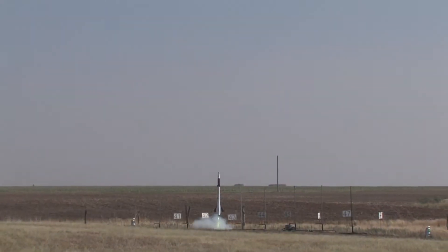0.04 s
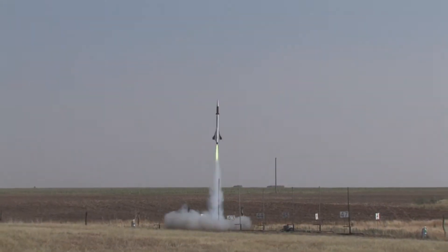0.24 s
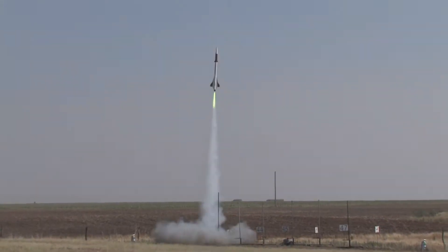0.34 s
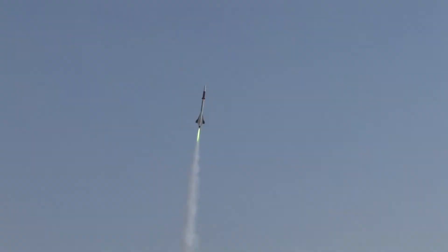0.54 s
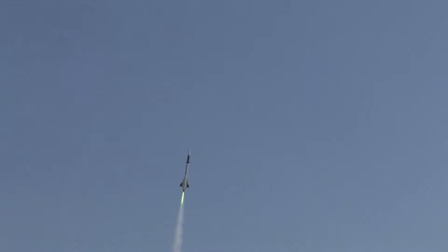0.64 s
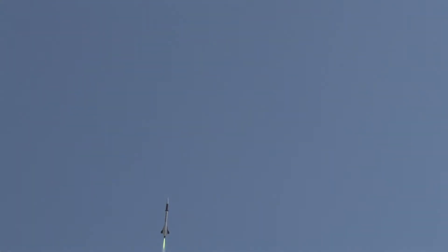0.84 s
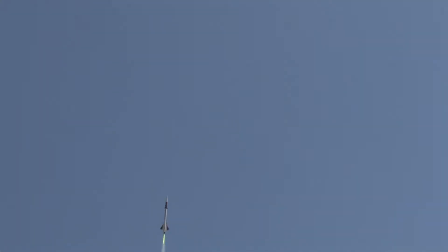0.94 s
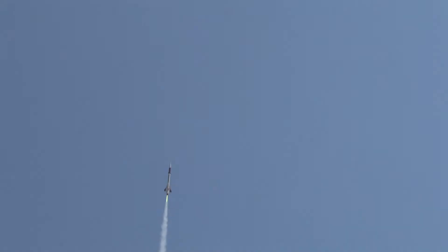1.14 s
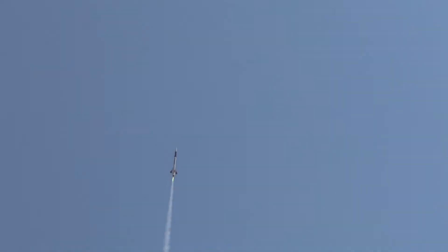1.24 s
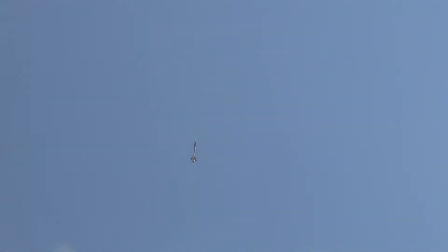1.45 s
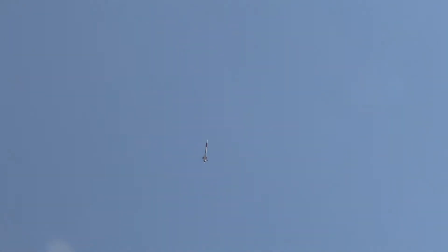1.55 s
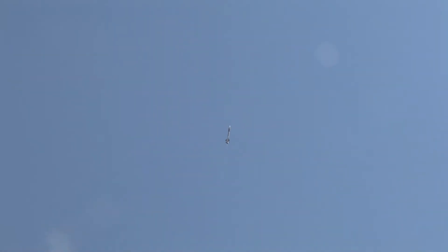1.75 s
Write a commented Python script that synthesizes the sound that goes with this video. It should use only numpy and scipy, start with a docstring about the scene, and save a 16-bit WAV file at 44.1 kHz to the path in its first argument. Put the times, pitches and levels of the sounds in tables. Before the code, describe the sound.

A small rocket lights with a few low puffs, then roars and crackles loudly as it climbs from an open field. The roar sweeps downward and cuts off, leaving a brief echo and a low breeze on the microphone.

```python
"""A low breeze on the microphone and a faint igniter hiss, then a small rocket lights on its pad in an
open field with a few low puffs and a hollow note. Its jet roars and crackles, swelling and fading in the
turbulent air, until it burns out. As it climbs away, the echo off the ground arrives ever later and
sweeps the roar downward. The field answers and lingers. Heard on a closely spaced microphone pair,
which overloads with a thin fizz."""
import sys
import numpy as np
from scipy import signal
from scipy.fft import rfft, irfft, next_fast_len
from scipy.io import wavfile
from scipy.ndimage import uniform_filter1d, map_coordinates

SR = 44100
rng = np.random.default_rng(int(sys.argv[2]) if len(sys.argv) > 2 else 0)


def dump_mix(stems):
    """Bounce the given channels to the path in sys.argv[1] as a 16-bit WAV at rate SR."""
    frames = np.atleast_2d(stems).T  # one column per channel
    limited = np.clip(frames, -1, 1)  # hard clip at full scale
    pcm = np.round(limited * 32767).astype(np.int16)
    wavfile.write(sys.argv[1], SR, pcm)


N = 79380
T = np.arange(N) / SR
LIGHT_S, BURNOUT_S, GATE_S = 0.1855, 1.613, 0.015
GROWL_START = (0.26, -55)  # seconds, dB

# The jet's lowest band. Each row: time in seconds, level in dB.
JET_GROWL = [(0.42, -25.5), (0.448, -36.5), (0.528, -35.5), (0.594, -28), (0.604, -23.5), (0.66, -27),
             (0.69, -25.5), (0.72, -29), (0.76, -26), (0.816, -33), (0.83, -27), (1.038, -35.5),
             (1.182, -32), (1.386, -34), (1.42, -26), (1.522, -45.5), (1.542, -36.5), (1.582, -49),
             (1.6, -41), (1.61, -44)]
# The jet's other three bands. Each row: time in seconds, then roar, hiss and treble levels in dB.
JET_LEVELS = [(0.19, -55, -46, -61), (0.2, -42.5, -38, -41.5), (0.3, -30, -22, -25.5),
              (0.394, -20, -17, -22.5), (0.442, -19.5, -20, -17.5), (0.47, -21, -19.5, -19.5),
              (0.526, -23.5, -17.5, -18), (0.548, -21.5, -21.5, -27), (0.584, -18.5, -29, -32.5),
              (0.616, -21, -23, -24), (0.656, -21, -18.5, -27.5), (0.688, -26, -21, -26.5),
              (0.734, -19, -23, -30.5), (0.75, -19, -22, -24), (0.814, -23.5, -22, -24.5),
              (0.842, -19.5, -18, -17.5), (0.878, -25, -25, -37.5), (0.904, -24, -23, -28.5),
              (0.916, -20, -20, -24.5), (0.932, -23, -19, -33), (0.944, -18.5, -23, -19.5),
              (0.952, -22.5, -17.5, -26), (0.984, -26, -19, -20.5), (1.016, -27, -32.5, -37),
              (1.024, -30.5, -26, -32), (1.09, -27, -26.5, -33), (1.11, -21.5, -15.5, -21),
              (1.142, -21.5, -18, -33), (1.166, -19.5, -23, -36), (1.182, -24, -19.5, -23),
              (1.198, -23, -20.5, -35.5), (1.25, -20, -14, -20), (1.276, -18.5, -18, -32.5),
              (1.304, -23.5, -21.5, -31), (1.372, -21, -24, -41), (1.396, -21.5, -21, -30),
              (1.428, -18.5, -26, -41.5), (1.454, -21.5, -20.5, -33), (1.478, -23.5, -23.5, -29.5),
              (1.522, -32.5, -30.5, -41.5), (1.538, -28, -31.5, -38), (1.586, -41, -37, -49.5),
              (1.598, -39, -44.5, -47), (1.61, -49, -51, -60)]
# Thin high fizz of the microphone overloading, flaring when the roar is loudest.
# Each row: time in seconds, level in dB.
OVERLOAD_FIZZ = [(.19, -78), (.205, -66), (.33, -49), (.45, -55), (.49, -53), (.52, -43), (.57, -54),
                 (.64, -48), (.7, -54.5), (.76, -51.5), (.845, -50), (.88, -59), (.96, -48), (1.035, -66),
                 (1.12, -54), (1.16, -61), (1.18, -47), (1.21, -58), (1.245, -31.5), (1.28, -52),
                 (1.38, -65), (1.404, -48), (1.435, -65.5), (1.47, -51.5), (1.54, -72), (1.61, -90)]
# The borders between growl, roar, hiss, treble and fizz, in Hz.
CROSSOVERS_HZ = [780, 2300, 4800, 11800]
# Jet spectrum before each band is levelled. Each row: frequency in Hz, relative level in dB.
JET_SPECTRUM = [(60, -32), (150, -25.5), (250, -13.5), (380, -11.5), (500, -4), (700, -4.5), (950, 0),
                (1180, -0.5), (1380, -3), (1800, 0), (2150, 1), (2700, -3.5), (3650, .5), (4250, 0.5),
                (5200, -11.5), (5900, -17), (6600, -11.5), (7400, -10.5), (8300, -16.5), (9400, -18.5),
                (12300, -35.5), (15500, -44)]
# Ground echo. Each row: time in seconds, lag in ms, gain (negative while the sound grazes the grass).
GROUND_ECHO = [(.2, 0.069, -0.47), (.45, 0.094, -0.31), (.53, 0.1, -0.91), (.565, 0.31, -0.3),
               (.61, 0.42, -0.53), (.68, 0.86, -0.55), (.74, 1.23, -0.56), (.81, 2.47, 0.75),
               (.92, 3.3, 0.29), (1.1, 4.4, 0.58), (1.33, 6.53, 0.78), (1.46, 7.63, 0.76),
               (1.61, 8.45, 0.64)]
# Single loud shocks. Each row: time in seconds, peak in dB before the low cut, half width in ms.
LOUD_SHOCKS = [(.6048, 1.5, .2), (.6206, -10, .1), (.7468, -9, .12), (.7672, -9, .12), (.9417, -7, .15),
               (1.402, -13, .3), (1.4205, -9, .15), (1.449, -8, .035), (1.541, -10, .09),
               (1.5988, -23, .28), (1.608, -29, .3)]
# Ignition puffs. Each row: time in seconds, peak in dB, pitch in Hz.
IGNITION_PUFFS = [(0.2033, -21.5, 120), (0.216, -12.5, 166), (0.2363, -8.5, 125), (.263, -7, 123),
                  (0.2842, -13, 119), (0.2997, -20, 75)]
# Exhaust striking the pad. Each row: time in seconds, level in dB.
BLAST_LEVEL = [(.19, -70), (.215, -30), (.25, -28), (.29, -25.5), (.39, -27.5), (.45, -61), (.55, -69)]
# Resonances of that blast. Each row: centre in Hz, width in Hz, relative level in dB.
PAD_RESONANCES = [(578, 115, -0.5), (463, 110, -2), (317, 80, -12), (970, 60, -2)]
# Rumble of the plume. Each row: time in seconds, relative level in dB.
PLUME_LEVEL = [(.19, -35), (.228, -20), (.27, -16), (.304, -21.5), (.34, -24), (.376, -28), (.44, -38),
               (.496, -46), (.61, -39.5), (.68, -44.5), (.79, -39.5), (.835, -38), (.87, -43.5),
               (1.05, -45.5), (1.14, -52), (1.37, -66), (1.405, -37.5), (1.45, -59), (1.61, -53)]
# Its spectrum. Each row: frequency in Hz, relative level in dB.
PLUME_SPECTRUM = [(25, -27), (65, -5), (190, -0.5), (280, 0.5), (420, -8.5), (900, -60)]
# Hiss of the igniter. Each row: time in seconds, level in dB.
IGNITER_LEVEL = [(.07, -88), (.13, -66.5), (.19, -56), (.23, -80)]
# What the field scatters back. Each row: frequency in Hz, relative level in dB.
FIELD_SPECTRUM = [(88, -29), (150, -10), (486, -15), (787, -12.5), (1050, -9), (1180, -7.5), (1730, -7.5),
                  (2600, -10.5), (3210, -13), (5840, -25.5), (15000, -57)]
# Wind at the microphone. Each row: time in seconds, level in dB.
BREEZE_LEVEL = [(0, -38.5), (.19, -37), (.4, -66.5), (1.6, -62), (1.8, -49.5)]
# Its spectrum. Each row: frequency in Hz, relative level in dB.
BREEZE_SPECTRUM = [(15, -26), (30, -8), (95, -6), (150, -12), (240, -12.5), (330, -19.5), (480, -23),
                   (600, -26.5), (900, -33), (2000, -38.5), (2800, -46), (4000, -48.5), (6000, -56.5),
                   (15000, -68)]
# Sound that differs between the two microphones. Each row: frequency in Hz, relative level in dB.
MIC_SIDE = [(60, -28.5), (500, -22), (1800, -20.5), (4000, -18), (8000, -33.5), (11000, -30), (13500, -7.5)]
# Balance of the pair. Each row: frequency in Hz, left over right in dB.
MIC_BALANCE = [(60, 1.8), (240, 2.2), (950, 1.35), (3770, 0.0), (15000, 0.0)]
# Phase across the pair. Each row: frequency in Hz, lead of the left in radians.
MIC_PHASE = [(0, 0), (520, 0.25), (2840, 0.0), (5340, 0.3), (7750, 0.018), (15500, 0.016)]


def jet():
    """Four bands of exhaust roar swell and fade as the air bends the sound; overload fizz sits on top."""
    roar = ground_echo(coloured(spread(turbulence()), JET_SPECTRUM))
    levels_db = curves([GROWL_START, *JET_GROWL]) + curves(JET_LEVELS) + curves(OVERLOAD_FIZZ)
    edges = [1, *CROSSOVERS_HZ, SR]
    out = 0
    for db, low, high in zip(levels_db, edges, edges[1:]):
        band = filtered(roar, lambda hz: lowpass(hz, high, 20) - lowpass(hz, low, 20))
        out += amp(db) * steady(band, size=1100)
    flutter_db = 0.8 * wobble(90.2)
    return out * amp(flutter_db) * burning()


def turbulence(patchy_db=2, shocks_per_s=2200, shock_spread_db=2, shock_share=0.34):
    """Exhaust tearing into still air: patchy mixing noise with a hail of small, uneven shocks."""
    spectrum = signal.stft(rng.standard_normal(N), nperseg=256)[2]
    patches = uniform_filter1d(rng.standard_normal(spectrum.shape), size=6, axis=0)  # across pitch
    patches = unit(uniform_filter1d(patches, size=8, axis=1))  # across time
    mixing = unit(signal.istft(spectrum * amp(patchy_db * patches), nperseg=256)[1][:N])
    sizes = amp(shock_spread_db * np.minimum(rng.exponential(size=N), 4))
    shocks = (rng.random(N) < shocks_per_s / SR) * sizes
    return np.sqrt(1 - shock_share) * mixing + np.sqrt(shock_share) * unit(shocks - shocks.mean())


def ground_echo(direct, grass_hz=2270):
    """The direct sound plus its ever later bounce off the ground; the grass swallows the echo's treble."""
    lag_ms, gain = curves(GROUND_ECHO)
    delayed_index = np.arange(N) - lag_ms * SR / 1000
    dull = filtered(direct, lambda hz: lowpass(hz, grass_hz, 2))
    return direct + gain * np.array([map_coordinates(channel, [delayed_index]) for channel in dull])


def cracks(low_cut_hz=370):
    """The strongest shocks reach the microphone as a dip and a steep swing up in pressure."""
    out = np.zeros(N)
    for time_s, db, half_width_ms in LOUD_SHOCKS:
        u = (T - time_s) * 1000 / half_width_ms
        out += amp(db) * u * np.exp((1 - u * u) / 2)
    return filtered(out, lambda hz: 1 - lowpass(hz, low_cut_hz, 4))


def puffs():
    """The motor chuffs as it lights: single low pushes of gas."""
    out = np.zeros(N)
    for time_s, db, hz in IGNITION_PUFFS:
        u = (np.pi * hz * (T - time_s)) ** 2
        out += amp(db) * (2 * u - 1) * np.exp(-u)
    return out


def tube_note(start_s=0.203, rise_s=0.009, pitch_hz=612, peak_db=-19.5, t60_s=0.056):
    """The first pop rings the motor tube with a hollow note."""
    age = T - start_s
    fall_db = 60 * np.maximum(age - rise_s, 0) / t60_s
    return amp(peak_db - fall_db) * ramp(age / rise_s) * np.sin(2 * np.pi * pitch_hz * age)


def pad_blast():
    """The exhaust strikes the pad and sounds its resonances until the rocket is clear."""
    def pad(hz):
        modes = sum(amp(db) * 1j * hz * width / (centre ** 2 - hz ** 2 + 1j * hz * width)
                    for centre, width, db in PAD_RESONANCES)
        return modes * lowpass(hz, 850, 8)
    return amp(curves(BLAST_LEVEL)[0]) * steady(filtered(noise(), pad), size=1200)


def plume_rumble(trim_db=-2, held_back_db=-5):
    """Low noise of the plume, held back while the motor still chuffs."""
    last_puff_s = IGNITION_PUFFS[-1][0]
    chuffing = ramp((last_puff_s - T) / GATE_S)
    level_db = curves(PLUME_LEVEL)[0] + trim_db + held_back_db * chuffing
    return amp(level_db) * steady(coloured(noise(), PLUME_SPECTRUM), size=1500) * burning()


def igniter(centre_hz=3440, half_width_hz=920):
    """The igniter spits on the pad: a faint hiss just before the motor catches."""
    hiss = filtered(noise(), lambda hz: 1 / (1 + ((hz - centre_hz) / half_width_hz) ** 2))
    return amp(curves(IGNITER_LEVEL)[0]) * unit(hiss)


def field(level_db=-42.5, build_s=0.5, fall_db_per_s=34.5):
    """The roar scattered back from the field around us: a wide wash of noise that outlasts the burn."""
    fall_db = fall_db_per_s * np.maximum(T - BURNOUT_S, 0)
    waver_db = 0.87 * wobble(30.7)
    wash = coloured(noise(wider_db=17), FIELD_SPECTRUM)
    return amp(level_db - fall_db + waver_db) * ramp((T - LIGHT_S) / build_s) * wash


def breeze():
    """Low wind noise right at the microphone."""
    wind = coloured(noise(wider_db=12.5), BREEZE_SPECTRUM)
    return amp(curves(BREEZE_LEVEL)[0]) * steady(wind, size=2500)


def burning():
    """1 while the motor burns, with quick edges."""
    return ramp((T - LIGHT_S) / GATE_S) * ramp((BURNOUT_S - T) / GATE_S)


def spread(mid, wider_db=0):
    """Left and right: the same white sound with some unrelated noise between them."""
    side = filtered(rng.standard_normal(N), lambda hz: amp(along(MIC_SIDE, hz) + wider_db))
    return mid + side * np.array([[1], [-1]])


def noise(wider_db=0):
    """White stereo noise."""
    return spread(rng.standard_normal(N), wider_db)


def steady(x, size):
    """Stereo noise held at rms 1 over stretches of size samples."""
    power = uniform_filter1d(uniform_filter1d(np.mean(x ** 2, axis=0), size), size)
    return x / np.sqrt(np.abs(power) + 1e-20)


def coloured(x, spectrum):
    """x shaped by (Hz, dB) rows, at rms 1."""
    return unit(filtered(x, lambda hz: amp(along(spectrum, hz))))


def filtered(x, response):
    """x through a complex response, given as a function of Hz."""
    size = next_fast_len(N + SR // 2)
    return irfft(rfft(x, size) * response(np.fft.rfftfreq(size, 1 / SR)), size)[..., :N]


def lowpass(hz, edge_hz, order):
    """Gain that falls from 1 to 0, passing one half at the edge."""
    return 1 / (1 + (hz / edge_hz) ** order)


def wobble(rate):
    """A smooth random curve, rate knots a second."""
    return map_coordinates(rng.standard_normal(int(N * rate / SR) + 4), [T * rate])


def curves(rows):
    """One value per sample for each column after the time."""
    times, *columns = np.transpose(rows)
    return [np.interp(T, times, column) for column in columns]


def along(rows, hz):
    """(Hz, value) rows read off on a log frequency axis."""
    freqs, values = np.transpose(rows)
    return np.interp(np.log(hz + 1), np.log(freqs + 1), values)


def ramp(x):
    """x held between 0 and 1."""
    return np.clip(x, 0, 1)


def amp(db):
    """Decibels to gain."""
    return 10 ** (np.asarray(db) / 20)


def unit(x):
    """x scaled to rms 1."""
    return x / np.sqrt(np.mean(x ** 2) + 1e-20)


def scene():
    """The launch at the microphone pair, a little louder and earlier on the left."""
    rocket = igniter() + jet() + cracks() + puffs() + plume_rumble() + tube_note() + pad_blast()
    sound = rocket + field() + breeze()
    half = np.array([[0.5], [-0.5]])
    balance = lambda hz: amp(half * along(MIC_BALANCE, hz))
    phase = lambda hz: np.exp(1j * half * along(MIC_PHASE, hz))
    return filtered(sound, lambda hz: balance(hz) * phase(hz))


def record(dry, treble_hz=1900, overload_db=-8, top_hz=15850):
    """The microphone overloads softly in the treble; the recorder stops at full scale and at top_hz."""
    treble = filtered(dry, lambda hz: 1 - lowpass(hz, treble_hz, 2))
    squashed = treble / (1 + np.abs(treble / amp(overload_db)) ** 6) ** (1 / 6)
    clipped = np.clip(dry - treble + squashed, -1, 1)
    return filtered(clipped, lambda hz: hz < top_hz)


dry = scene()
out = record(dry)
dump_mix(out)
```